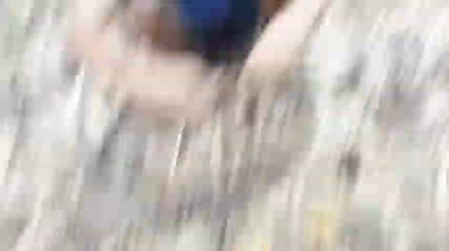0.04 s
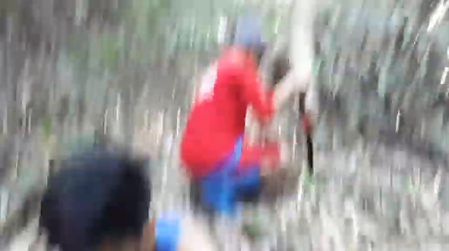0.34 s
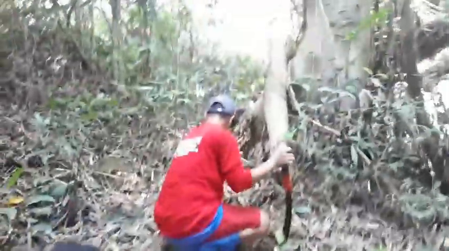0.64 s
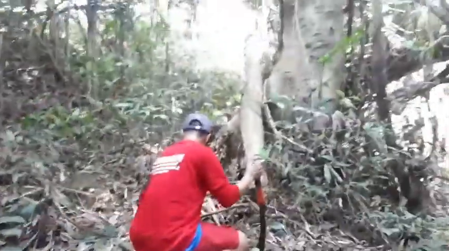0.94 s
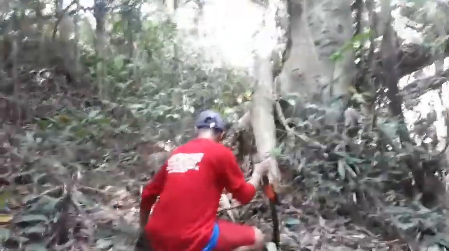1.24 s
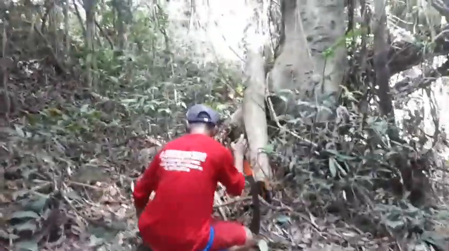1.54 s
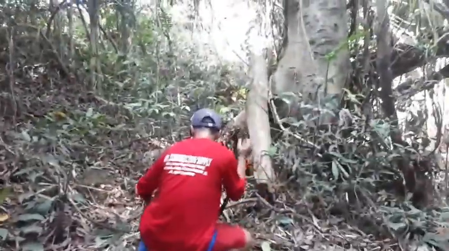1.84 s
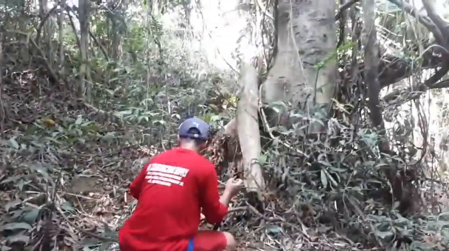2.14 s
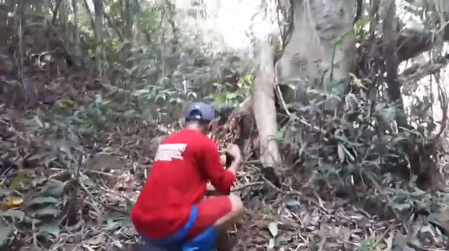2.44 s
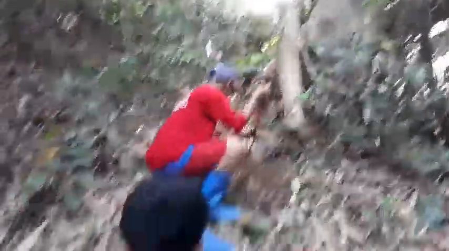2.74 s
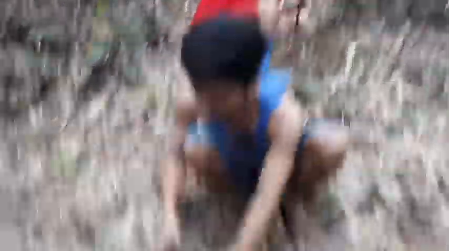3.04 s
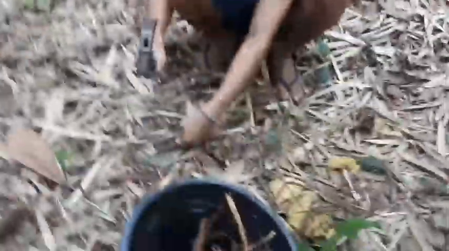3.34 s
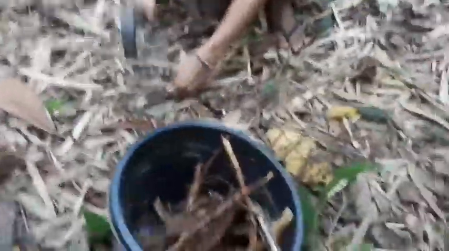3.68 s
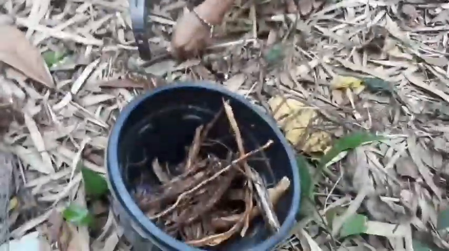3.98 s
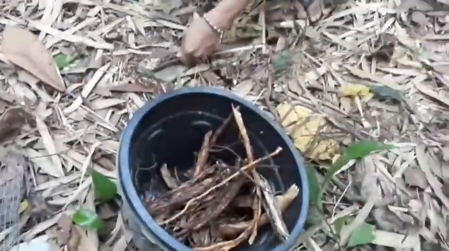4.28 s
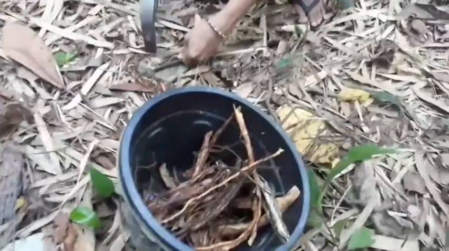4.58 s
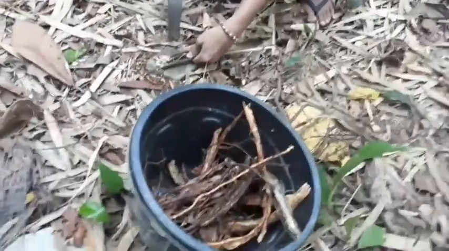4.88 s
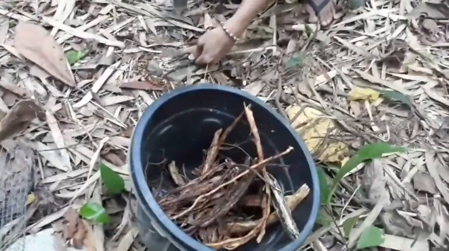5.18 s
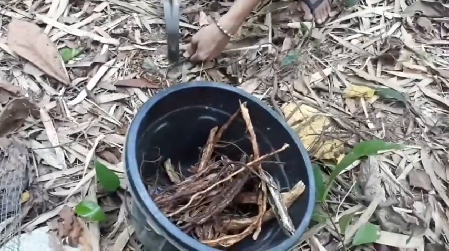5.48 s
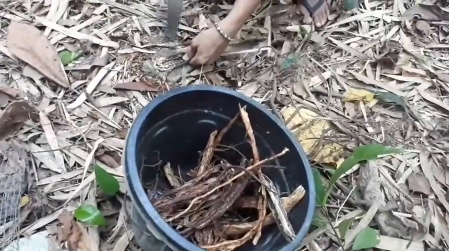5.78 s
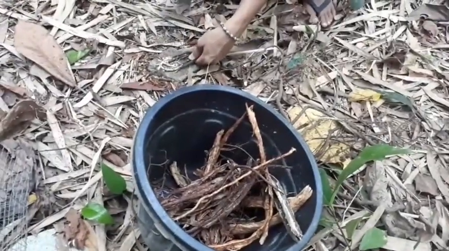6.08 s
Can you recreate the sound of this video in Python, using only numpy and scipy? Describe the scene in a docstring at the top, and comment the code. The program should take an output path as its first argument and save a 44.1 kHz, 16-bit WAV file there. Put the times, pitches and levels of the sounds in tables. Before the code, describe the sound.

Outdoors among trees, heard from about a metre on a hand-held phone, dry leaf litter crinkles, shoes scuff and twigs snap over a faint insect hiss. Then a hammer strikes a root on soft ground ten times at an even pace. The blows crack and thud, growing harder and more ringing, with a short echo and a brief low hum from a nearby plastic bucket. Fingers occasionally brush the phone.

```python
"""Dry leaves rustle over a faint hiss of far insects as someone shifts about and handles roots.
Twigs snap, roots tap, shoes scuff; from 2 s a hammer pounds a root, twice a second. Each blow crushes
fibres, knocks the root, thuds into soft soil, shakes a plastic bucket and may rebound; trunks echo it.
A hand-held phone with two ports hears it from about a metre, along with fingers sliding on its case."""
import sys
import numpy as np
from scipy import signal
from scipy.fft import rfft, irfft, next_fast_len
from scipy.io import wavfile
from scipy.ndimage import uniform_filter1d, map_coordinates

SR = 44100
rng = np.random.default_rng(int(sys.argv[2]) if len(sys.argv) > 2 else 0)


def generate_wav(sig):
    """Save sig (samples, or channels by samples) to the path in sys.argv[1] as 16-bit PCM at SR."""
    pcm = np.round(np.clip(np.atleast_2d(sig).T, -1, 1) * 32767).astype(np.int16)
    wavfile.write(sys.argv[1], SR, pcm)


N = 278521
TIME = np.arange(N) / SR

# hammer blows: start_s, force_db, hardness_db_per_oct, knock_hz, knock_db, clack_hz, clack_db,
# crack_hz, crack_db, crack_tilt_db_per_oct, crack_t60_s, stop_db (re force), tick_db
BLOWS = [(2.022, -23, -27, 840, -31, 684, -47, 5340, -22.5, 0, 0.0075, -2.5, -34),
         (2.4807, -17, -2.5, 870, -24, 2340, -38, 12400, -22.5, -2, 0.005, -5.5, -47),
         (2.9614, -13.5, -6, 876, -15.5, 1160, -17, 7640, -27, -2, 0.013, -8, -51),
         (3.4445, -16, 4, 1410, -20.5, 2110, -32, 7900, -23, 3, 0.008, -4.5, -39.5),
         (3.934, -15, 2, 612, -24.5, 2220, -30.5, 12140, -20.5, -0.5, 0.015, -4, -31.5),
         (4.418, -13.5, 7.5, 1320, -10.5, 1679, -14, 11020, -18, -0.5, 0.011, -5.5, -27.5),
         (4.8927, -17, -0.5, 1085, -22, 2450, -28, 7700, -16, 0.5, 0.018, -3.5, -26),
         (5.3686, -18.5, 4.5, 1010, -27.5, 1350, -24, 10900, -19, 5, 0.007, -3, -28),
         (5.8287, -17.5, 4.5, 1106, -17, 1850, -16.5, 12000, -20.5, 0, 0.0095, -2, -42),
         (6.295, -18.5, 6, 1064, -9.5, 1910, -11, 10500, -19.5, -7, 0.02, -1.5, -21.5)]


def undb(db):
    """Decibels to gain."""
    return 10 ** (np.asarray(db) / 20)


def unit(x):
    """Scale to rms 1."""
    return x / np.sqrt(np.mean(x ** 2))


def pan_gains(pan_db):
    """Port gains; pan_db is left minus right."""
    return undb(np.array([[0.5], [-0.5]]) * pan_db)


def colour(x, points):
    """Filter by (freq_hz, gain_db) points joined on a log-frequency axis."""
    size = next_fast_len(x.shape[-1] + 2048)
    hz, db = np.transpose(points)
    bins_hz = np.maximum(np.fft.rfftfreq(size, 1 / SR), 1)
    gain = undb(np.interp(np.log(bins_hz), np.log(hz), db))
    return irfft(rfft(x, size) * gain, size)[..., :x.shape[-1]]


def band(x, lo_hz, hi_hz, order=2):
    """Causal band-pass."""
    return signal.sosfilt(signal.butter(order, [lo_hz, hi_hz], "band", fs=SR, output="sos"), x)


def low_cut(x, hz):
    """First-order high-pass."""
    return signal.sosfilt(signal.butter(1, hz, "high", fs=SR, output="sos"), x)


def fade(t, t60_s):
    """Exponential decay from t = 0."""
    return (t >= 0) * np.exp(-np.log(1000) * np.abs(t) / t60_s)


def ring(t, hz, t60_s):
    """One struck mode."""
    return np.sin(2 * np.pi * hz * t) * fade(t, t60_s)


def around(at_s):
    """Samples within 0.25 s of at_s, and their times relative to it."""
    centre = int(at_s * SR)
    span = slice(max(centre - SR // 4, 0), centre + SR // 4)
    return span, TIME[span] - at_s


def walk(rate_hz):
    """Smooth random wander, spread near 1."""
    size = int(SR / rate_hz)
    return uniform_filter1d(np.repeat(rng.standard_normal(N // size + 1), size), size)[:N]


def grains(spread_db, apart):
    """Dense uneven clicks in stereo; apart weights what each port hears alone."""
    sizes = undb(spread_db * np.repeat(rng.standard_normal(N // 16 + 1), 16)[:N])
    return unit(sizes * (rng.standard_normal(N) + apart * rng.standard_normal((2, N))))


def burst(envelope, noise):
    """Shaped noise with the energy of its envelope."""
    return unit(envelope * noise) * np.sqrt(np.mean(envelope ** 2))


def forest(air_db=-61, waver_db=2.1):
    """Still air and far insect choruses, each wavering by itself."""
    # air spectrum: freq_hz, gain_db
    air_spectrum = [(30, -10.5), (80, 3.5), (160, 1.5), (400, -4), (900, -6), (1400, -5), (2300, -15),
                    (3400, -19.5), (4750, -3.5), (7200, -3.5), (9500, 2.5), (11500, -11.5), (14000, -14),
                    (16000, -28.5)]
    # insect choruses: centre_hz, width_hz, level_db
    insects = [(7010, 490, -64.5), (7410, 260, -65), (8420, 420, -60), (9520, 640, -60.5),
               (10840, 600, -69.5)]
    out = undb(air_db + walk(rate_hz=6)) * unit(colour(grains(spread_db=3, apart=0.97), air_spectrum))
    for hz, width_hz, db in insects:
        chorus = band(rng.standard_normal((2, N)), hz - width_hz / 2, hz + width_hz / 2)
        out += undb(db + waver_db * walk(rate_hz=9.7)) * unit(chorus)
    return out


def litter_moves(stir_db=-63.5, jolt_db=-34.5, jolt_t60_s=0.68, jolt_pan_db=-6, release_ratio=1.49):
    """Crouching body, blows, feet and hands stir the leaves: rows of envelope, pan_db, tilt_db_per_oct."""
    # foot and hand moves: peak_s, swell_s, level_db, pan_db, tilt_db_per_oct
    rustles = [(0.08, 0.035, -44, -0.5, 0.5), (0.242, 0.044, -45.5, 0.5, -1.5),
               (0.375, 0.046, -44, -3.5, 1), (0.766, 0.14, -49.5, -1, -1.5), (1.022, 0.068, -41.5, 2, -0.7),
               (1.278, 0.11, -44.5, 1.5, 0), (1.829, 0.026, -46, 0.5, 0.5), (2.391, 0.03, -42, -2, 1),
               (2.578, 0.011, -40, -2.5, 2.5), (2.634, 0.058, -51.5, 2, 1), (3.02, 0.013, -45, 3.5, -3),
               (3.095, 0.024, -44.5, 6.5, 1.2), (3.618, 0.09, -53, -1.5, -4.5),
               (3.612, 0.0087, -48, 9, 6.5), (3.857, 0.047, -45, -5, -1.5), (4.063, 0.025, -52, -1.5, 0),
               (4.29, 0.11, -56.5, -5, 2), (4.739, 0.032, -50.5, -3, 1.5), (5.989, 0.069, -56, -6, 0)]
    jolts = sum(undb(force_db + jolt_db) * fade(TIME - start_s, jolt_t60_s)
                for start_s, force_db, *_ in BLOWS)
    moves = [(np.full(N, undb(stir_db)), 0, 0.9), (jolts, jolt_pan_db, 0.9)]
    for peak_s, swell_s, db, pan_db, tilt_db_per_oct in rustles:
        offset = (TIME - peak_s) / np.where(TIME < peak_s, swell_s, release_ratio * swell_s)
        moves.append((undb(db) / (1 + offset ** 2 / 6) ** 3, pan_db, tilt_db_per_oct))
    return moves


def leaves(flutter_db=1.84, patchy_db=2.5, bands=14, pivot_hz=6000):
    """Dry litter crinkles under shifting weight; each leaf briefly favours its own band."""
    # crinkle spectrum: freq_hz, gain_db
    leaf_spectrum = [(60, -10.5), (300, -14.5), (750, -2.5), (1500, 0), (3200, -2), (7500, 0), (12000, -2),
                     (16000, -8)]
    envelopes, pan_db, tilt_db_per_oct = (np.array(column) for column in zip(*litter_moves()))
    power = envelopes ** 2
    size = next_fast_len(N)
    spectrum = rfft(unit(colour(grains(spread_db=1.5, apart=2.44), leaf_spectrum)), size)
    edges_hz = np.geomspace(1000, 17000, bands + 1)
    bin_band = np.searchsorted(edges_hz[1:-1], np.fft.rfftfreq(size, 1 / SR))
    crinkle = np.zeros((2, N))
    for k in range(bands):
        # brittle leaves are brighter
        gains = pan_gains(pan_db) * undb(tilt_db_per_oct * np.log2(edges_hz[k] / pivot_hz))
        swell = np.sqrt(gains ** 2 @ power) * undb(patchy_db * walk(rate_hz=14))
        crinkle += swell * irfft(spectrum * (bin_band == k), size)[:, :N]
    return undb(flutter_db * walk(rate_hz=70)) * crinkle


def rubs(strokes, edge_ratio, grit_db, order):
    """Friction noise in Gaussian swells; edge_ratio is lower over upper band edge."""
    out = np.zeros((2, N))
    friction = grains(spread_db=3, apart=0.48)
    for peak_s, sigma_s, db, upper_hz, pan_db in strokes:
        span, t = around(peak_s)
        rub = unit(band(friction[:, span], edge_ratio * upper_hz, upper_hz, order=order))
        grit = unit(band(friction[:, span], 1.6 * upper_hz, 3 * upper_hz, order=1))
        swell = np.exp(-0.5 * (t / sigma_s) ** 2)
        out[:, span] += undb(db) * pan_gains(pan_db) * swell * (rub + undb(grit_db) * grit)
    return out


def fingers():
    """Fingers slide on the phone near one port or the other."""
    # slides: peak_s, sigma_s, level_db, upper_hz, pan_db
    slides = [(.230, 0.013, -43.5, 1400, -15), (.269, 0.0093, -41.5, 1600, -26.5),
              (.282, 0.011, -41.5, 1320, -28.5), (.360, 0.016, -45, 1500, -30),
              (1.217, 0.022, -45, 5800, 21), (3.617, 0.014, -43.5, 1610, -29)]
    return rubs(slides, edge_ratio=0.054, grit_db=-30, order=2)


def snaps_and_taps():
    """Twigs snap and a nudged root gives light taps."""
    # snaps and taps: start_s, level_db, pitch_hz, t60_s
    clicks = [(0.789, -19.5, 5250, 0.01), (2.337, -37, 740, .016), (2.57, -27, 4280, 0.019),
              (4.387, -41.5, 1185, 0.09), (5.281, -53.5, 1400, 0.027), (6.18, -43.5, 4350, .035)]
    out = np.zeros((2, N))
    noise = grains(spread_db=0.5, apart=0.13)
    for start_s, db, hz, t60_s in clicks:
        span, t = around(start_s)
        click = band(noise[:, span], 0.66 * hz, 1.12 * hz, order=1)
        out[:, span] += undb(db) * burst(fade(t, t60_s), click)
    return out


def trunks(x, echo_db=-18.5, t60_s=0.22, delay_s=0.012):
    """Slope, trunks and undergrowth scatter a short, thin echo."""
    # echo spectrum: freq_hz, gain_db
    echo_spectrum = [(50, -1.5), (170, -7), (380, -1.5), (1500, 0), (5000, -3.5), (16000, 0.5)]
    size = SR // 2
    scatter = colour(grains(spread_db=4, apart=0.87)[:, :size], echo_spectrum)
    response = undb(echo_db) * unit(scatter * fade(TIME[:size] - delay_s, t60_s)) / np.sqrt(size)
    return signal.fftconvolve(x, response, axes=1)[:, :N]


def bumps(t60_s=0.037):
    """Soft thuds damped at once by the soil: light things meeting the ground, and at 4.46 s the hammer head
    dropping back after a blow."""
    # soft impacts: start_s, level_db, pitch_hz
    impacts = [(1.195, -46, 136), (1.376, -48, 202), (2.569, -37.5, 520), (2.936, -43.5, 170),
               (3.17, -41.5, 263), (3.619, -29, 239), (4.388, -40, 342), (4.464, -31, 240)]
    out = np.zeros(N)
    for start_s, db, hz in impacts:
        span, t = around(start_s)
        out[span] += undb(db) * ring(t, hz, t60_s)
    return out


def scuffs():
    """Shoes, hands and roots scrape the ground."""
    # scrapes: peak_s, sigma_s, level_db, upper_hz, pan_db
    scrapes = [(1.754, 0.0088, -50, 660, -1), (1.781, 0.011, -48.5, 465, -1), (1.829, 0.025, -48, 485, 0.5),
               (1.845, .022, -61, 1280, -4), (2.33, 0.021, -53.5, 945, -16.5),
               (3.02, 0.056, -51.5, 610, -3.5), (3.183, 0.01, -46.5, 474, 0), (3.17, 0.097, -55, 1112, 0)]
    return rubs(scrapes, edge_ratio=0.7, grit_db=-38.5, order=1)


def fibres(bite_s=0.0021, pitched_db=-3, settle_db=-29, settle_t60_s=0.29):
    """Fibres crackle as the head bites, burst when the root is flat, then crunch as they spring back."""
    # crack spectrum: freq_hz, gain_db
    crack_spectrum = [(300, -10.5), (1200, -1), (2500, 1.5), (3500, 0.5), (5000, 6), (7500, 5.5),
                      (11000, 6.5), (16000, -6.5)]
    out = np.zeros((2, N))
    splits = grains(spread_db=0.5, apart=2.5)
    crunch = unit(band(grains(spread_db=4.5, apart=0.76), 290, 2200))
    for start_s, force_db, *_, crack_hz, crack_db, tilt_db_per_oct, crack_t60_s, _, _ in BLOWS:
        span, t = around(start_s)
        tilted = [(hz, db + tilt_db_per_oct * np.log2(hz / crack_hz)) for hz, db in crack_spectrum]
        broad = unit(colour(splits[:, span], tilted))
        pitched = unit(band(splits[:, span], 0.92 * crack_hz, 1.08 * crack_hz, order=1))
        bite = (t < 0) * np.exp(-(t / bite_s) ** 2)
        crack = burst(bite + fade(t, crack_t60_s), broad + undb(pitched_db) * pitched)
        settle = burst(fade(t, settle_t60_s), crunch[:, span])
        out[:, span] += undb(crack_db) * crack + undb(force_db + settle_db) * settle
    return out


def hammer(stop_hz=140, contact_s=0.00033):
    """Root, head and handle ring briefly; the soil heaves, then stops the head."""
    # modes of the root on its bed: freq_hz, gain_db, t60_s
    root_modes = [(360, -0.5, 0.024), (630, -0.5, 0.023), (1220, -22.5, 0.023)]
    # pitched tick in each crack: freq_hz, gain_db, t60_s
    tick_modes = [(4830, 0.5, 0.024), (5360, -1, 0.018), (10810, -3, .018)]
    out = np.zeros(N)
    for k, blow in enumerate(BLOWS):
        start_s, force_db, hardness_db_per_oct, knock_hz, knock_db, clack_hz, clack_db = blow[:7]
        stop_db, tick_db = blow[-2:]
        span, t = around(start_s)
        # as the root flattens, the head sinks longer and rings more
        sink_s = 0.01067 + k * 0.00007
        head = undb(-48.5 + k * 3.5) * ring(t, hz=1553, t60_s=0.043)
        # harder contact reaches higher modes
        root = sum(undb(db + hardness_db_per_oct * np.log2(hz / root_modes[0][0])) * ring(t, hz, t60_s)
                   for hz, db, t60_s in root_modes)
        # packed soil brakes the head in one smooth push
        phase_sq = (np.pi * stop_hz * (t - sink_s)) ** 2
        stop = undb(stop_db) * (1 - 2 * phase_sq) * np.exp(-phase_sq)
        soil = ring(t, hz=204, t60_s=0.048)
        thud = undb(force_db) * (soil - root + stop)  # root goes down, soil rises
        # each blow meets a new piece with its own pitches
        knock = undb(knock_db) * ring(t, knock_hz, t60_s=0.016)
        clack = undb(clack_db) * ring(t, clack_hz, t60_s=0.013)
        cushioned = uniform_filter1d(thud - knock, int(contact_s * SR))  # soft bark spreads the push
        tick = sum(undb(tick_db + db) * ring(t, hz, t60_s) for hz, db, t60_s in tick_modes)
        handle = undb(-40.5) * ring(t, hz=660, t60_s=0.12)
        out[span] += cushioned + clack + head + tick + handle
    return out


def bucket(delay_s=0.004):
    """Each shock crosses the soil and sets a nearby plastic bucket humming."""
    # wall modes: freq_hz, gain_db (re force), t60_s
    wall_modes = [(105, -39.5, 0.33), (202, -25, 0.12), (344, -22, 0.04)]
    out = np.zeros(N)
    for start_s, force_db, *_ in BLOWS:
        span, t = around(start_s + delay_s)
        out[span] += sum(undb(force_db + db) * ring(t, hz, t60_s) for hz, db, t60_s in wall_modes)
    return out


def rebounds(t60_s=0.072):
    """After some blows the head drops back on the split root with a soft crunch."""
    # landings: start_s, level_db, pitch_hz
    landings = [(2.064, -48.5, 1590), (3.489, -39.5, 1950), (4.462, -46, 1147), (5.424, -44.5, 780),
                (5.881, -46, 697)]
    out = np.zeros((2, N))
    splits = grains(spread_db=0.5, apart=0.5)
    for start_s, db, hz in landings:
        span, t = around(start_s)
        crunch = band(splits[:, span], hz / np.sqrt(2), hz * np.sqrt(2), order=1)
        out[:, span] += undb(db) * burst(fade(t, t60_s), crunch)
    return out


def scene():
    """Impacts and their echo, ground noise, fingers on the phone, forest."""
    hits = hammer() + fibres() + rebounds() + bucket() + snaps_and_taps() + bumps()
    return leaves() + scuffs() + fingers() + hits + trunks(hits) + forest()


def record(dry, lag_s=0.00012, top_hz=15900):
    """Sound reaches the left port first; each port has its own resonances and roll-off; the top is cut."""
    # left port response: freq_hz, gain_db
    left_port = [(100, 7.5), (1500, -5), (2700, 0), (4100, 3.5), (5400, 0), (6500, 2), (7500, 3.5),
                 (8800, -6), (10000, -2.5), (15000, 3)]
    # right port response: freq_hz, gain_db
    right_port = [(25, -6), (100, 8), (400, 0.5), (1500, -6.5), (3100, -1), (4900, 7.5), (5850, -4),
                  (7200, 1), (8700, -8.5), (11400, 7.5), (13300, 4.5), (15000, -13)]
    late = map_coordinates(dry[1], [np.arange(N) - lag_s * SR], order=3)
    # unequal roll-offs put the bass slightly out of step
    left = low_cut(colour(dry[0], left_port), hz=43.45)
    right = low_cut(colour(late, right_port), hz=12)
    top_cut = signal.ellip(10, 0.2, 80, top_hz, fs=SR, output="sos")
    return signal.sosfilt(top_cut, np.array([left, right]))


dry = scene()
out = record(dry)
generate_wav(out)
```